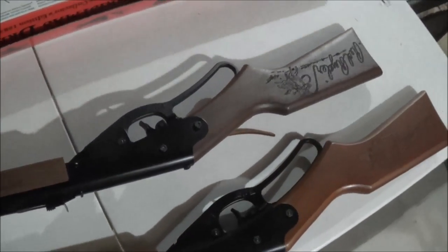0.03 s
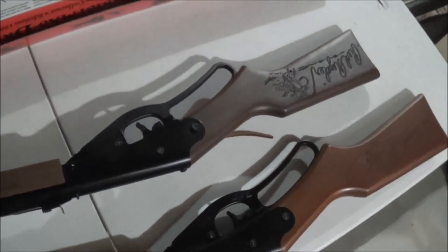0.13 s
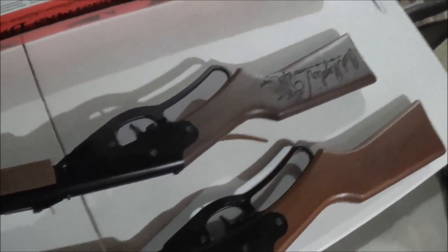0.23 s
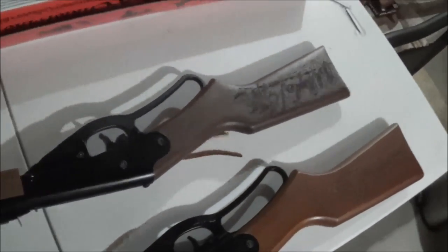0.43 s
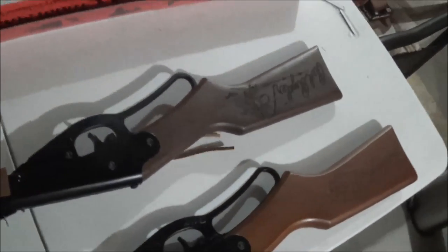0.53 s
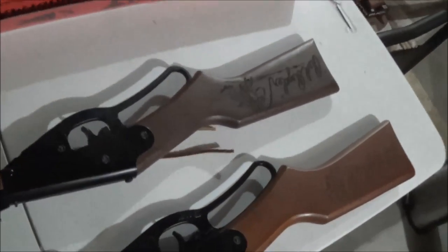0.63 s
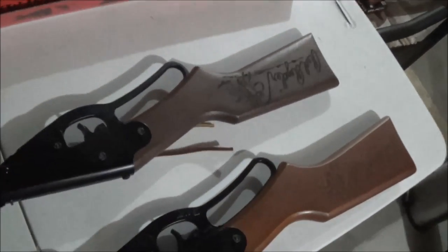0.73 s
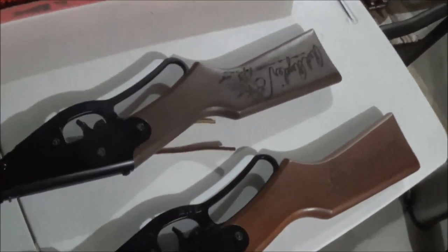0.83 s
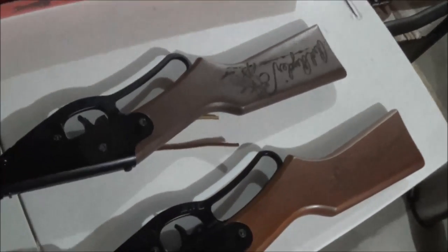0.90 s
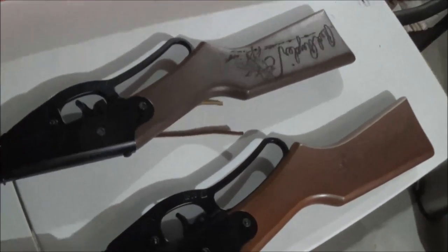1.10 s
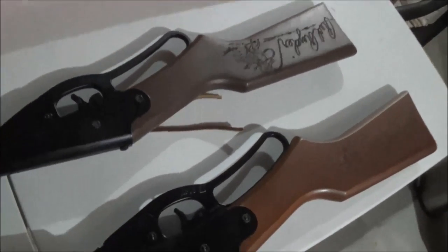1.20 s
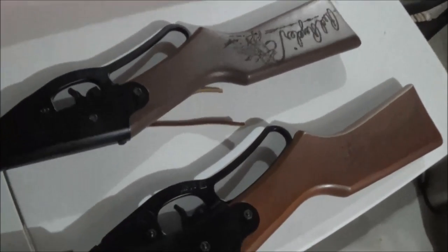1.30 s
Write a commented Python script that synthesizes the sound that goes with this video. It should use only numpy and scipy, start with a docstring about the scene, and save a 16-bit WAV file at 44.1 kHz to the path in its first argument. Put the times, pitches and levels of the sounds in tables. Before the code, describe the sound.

A close microphone in a small room catches a single woody knock with a bright click, then a scrape and quick clattering blows of wooden stocks and metal parts on a table, fading to soft bumps and hiss.

```python
"""Long guns of wood and metal are set down and shifted on a hard tabletop, close to the microphone.
Each contact excites table, stock and metal action as damped modes, decaying noise bursts and short pulses.
Single spots of the tabletop and loose metal pieces ring on as decaying sines.
Sliding wood and rattling metal are coloured noise broken up by many small catches.
A small room answers with a few reflections and a short tail, over faint hiss and a thin electronic whine."""
import sys
import numpy as np
from scipy import signal
from scipy.fft import rfft, irfft, next_fast_len
from scipy.io import wavfile
from scipy.ndimage import map_coordinates

SR = 44100
rng = np.random.default_rng(int(sys.argv[2]) if len(sys.argv) > 2 else 0)


def log_audio(samples):
    """Write samples as a 16-bit WAV file to the path given in sys.argv[1]."""
    # one column per channel
    frames = np.atleast_2d(samples).T
    # limit to full scale, then quantise
    limited = np.clip(frames, -1, 1)
    pcm = np.round(limited * 32767).astype(np.int16)
    wavfile.write(sys.argv[1], SR, pcm)


N = 59535

# Background hiss: freq_hz, relative_db
HISS_SPECTRUM = [(25, -21), (70, -1), (150, -11), (400, -14.5), (1000, -12), (3000, -14.5), (8000, -17),
                 (15000, -19.5), (16500, -40)]
# Hiss loudness: time_s, level_db
HISS_LEVEL = [(0, -52.5), (.45, -53.5), (.65, -57), (1.0, -57), (1.35, -58)]
# Hiss width: freq_hz, side_over_mid_db
HISS_SIDE = [(60, -19), (600, 4.5), (5000, -3.5), (11000, -17.5)]
WHINE_RMS_DB, WHINE_HZ = -61.5, 15734

# Room decay: freq_hz, t60_s
ROOM_T60 = [(80, 0.59), (400, 0.28), (1500, 0.27), (4000, 0.11), (10000, 0.07), (16000, 0.078)]
ROOM_TAIL_DB, ROOM_WALLS_DB, ROOM_SIDE_DB = -13.5, -26.5, -11.5
ROOM_DELAY_S, ROOM_BASS_CUT_HZ = .007, 128

# Sliding and handling loudness: time_s, level_db
SLIDE_LEVEL = [(0, -47.5), (.17, -54.5), (.3, -43), (.42, -39), (.47, -37.5), (.505, -28.5), (.56, -31),
               (.68, -55), (.82, -54.5), (.97, -49.5), (1.1, -58.5), (1.21, -58.5), (1.235, -53),
               (1.35, -59)]
# Sliding colour: freq_hz, relative_db
SLIDE_SPECTRUM = [(30, -10.5), (100, 7.5), (170, 3.5), (400, 0.5), (700, -7), (1500, -16.5), (3500, -22),
                  (7000, -31.5), (15000, -54)]
# Metal rattle loudness: time_s, level_db
RATTLE_LEVEL = [(.46, -49.5), (.5, -31.5), (.53, -40), (.555, -43), (.6, -33), (.66, -66), (.72, -97)]
# Metal rattle colour: freq_hz, relative_db
RATTLE_SPECTRUM = [(600, 10), (1500, -1.5), (2400, -1.5), (3400, -9), (5500, -12), (8000, -13.5),
                   (15000, -26)]

# Table's first heave under a blow: pitch_hz, level_db, t60_s
HEAVE_MODES = [(169, 10, .018)]
# Table frame modes: pitch_hz, level_db, t60_s
FRAME_MODES = [(62.2, -7.5, 0.56), (145.8, -9, 0.34)]
# Tabletop modes: pitch_hz, level_db, t60_s
TOP_MODES = [(269, -20.5, 0.13), (480, -8, 0.13), (510, -10, 0.09), (660.4, -7.5, 0.095), (766, -23, 0.2),
             (934, -4.5, 0.071)]
# Wooden stock modes: pitch_hz, level_db, t60_s
STOCK_MODES = [(1330, -1.5, 0.027), (2330, -3, 0.025), (3140, -8.5, 0.039)]

# Dense resonances of the table under the thud: freq_hz, relative_db
THUD_SPECTRUM = [(25, -35), (45, -16), (62, 18), (110, 17), (190, -6), (300, -8), (600, -30), (2000, -84)]
# Dense resonances of the tabletop: freq_hz, relative_db
TOP_SPECTRUM = [(60, -23), (160, -0.5), (300, 3.5), (450, 0), (700, -3), (1000, -7), (1600, -35),
                (3500, -19), (9000, -115)]
# Dense resonances of the stock: freq_hz, relative_db
STOCK_SPECTRUM = [(80, -14), (380, 3.5), (850, -0.5), (1350, -3.5), (1600, -4), (2400, 1), (3300, -26),
                  (3900, -23), (9000, -89)]
# Dense resonances of the metal action: freq_hz, relative_db
METAL_SPECTRUM = [(200, -33), (1200, -5), (2500, 7), (4000, 1.5), (5300, 6), (7300, -7), (9000, -5.5),
                  (12000, -47), (15500, -51)]
# Bright click: freq_hz, relative_db
CLICK_SPECTRUM = [(500, -74), (4000, -7.5), (6500, -7), (9000, -6.5), (10100, -3), (11200, -6),
                  (12500, -13.5), (15500, -27)]

# Contacts: start_s, thud_db, top_db, stock_db, metal_db, click_db
CONTACTS = [(0.2018, -64, -24, -18, -41, -75), (0.2258, -18, -20.5, -15.5, -25.5, -9.5),
            (0.442, -64, -52, -39.5, -70, -81), (.467, -23.5, -35.5, -44, -70, -56),
            (0.4884, -28, -30, -28, -34, -38), (0.518, -39, -40, -21, -10.5, -20.5),
            (0.5436, -21.5, -18, -18, -10.5, -35), (0.5458, -21.5, -15, -16, -40, -12),
            (0.5744, -24.5, -12.5, -24.5, -18.5, -23.5), (.588, -19.5, -18.5, -58, -50, -35),
            (0.6047, -29, -49, -53, -35, -44), (0.628, -23.5, -39, -37, -38, -16.5),
            (0.8783, -54, -40.5, -36.5, -71, -82), (.889, -65, -38.5, -69, -70, -72)]
# Spot of tabletop or loose metal piece that rings most: start_s, pitch_hz, level_db, t60_s
LOOSE_RINGS = [(0.225, 309.5, -24.5, 0.34), (.228, 417.3, -22.5, 0.22), (0.2261, 10020, -11, 0.013),
               (.442, 1145, -27.5, 0.028), (0.5183, 2938, -15, 0.075), (0.5181, 5150, -13, 0.014),
               (0.5444, 4115, -7, 0.013), (0.5472, 2430, -12.5, 0.024), (.547, 424.6, -8, 0.15),
               (0.574, 2437, -8.5, 0.021), (.575, 293.2, -16, 0.23), (.59, 409.9, -21.5, 0.31),
               (0.6052, 2290, -17.5, 0.017), (.6285, 2375, -22, 0.024), (0.6292, 5000, -28, 0.026),
               (0.887, 417.2, -31, 0.15)]

# Lead of the left port: freq_hz, lead_rad
PORT_LEAD = [(0, 0), (150, 0.025), (520, 0.36), (1500, 1), (2000, 0.24), (3000, 0.58), (4200, 0.62),
             (6800, 0.53), (10000, 0.31), (16000, 0.4)]
# Extra left lead of the tabletop's low sound: time_s, lead_rad
TABLE_LEAD = [(.5, 0), (.55, 0.51), (.7, 0.52), (.85, 0)]
TABLE_LEAD_HZ = 890

THUD_BURST_DB, FRAME_DB, TOP_BURST_DB, TOP_MODES_DB, STOCK_BURST_DB = -6, -3, 1, 2, -2.5
STOCK_SNAP_DB, METAL_SNAP_DB = 14.5, 9.5
THUD_T60_S, TOP_T60_S, STOCK_T60_S, METAL_T60_S, CLICK_T60_S = 0.06, 0.17, 0.058, 0.023, 0.017
TABLE_ATTACK_S, CONTACT_ATTACK_S = 0.0054, .0001
BODY_LEFT_OVER_RIGHT_DB = -0.5
BAND_LIMIT_HZ = 16300


def amp(db):
    """Decibels to gain."""
    return 10 ** (np.asarray(db) / 20)


def unit(x):
    """Scale to rms 1."""
    return x / np.sqrt(np.mean(x ** 2) + 1e-20)


def along(points, hz):
    """Interpolate (freq_hz, value) points on a log frequency axis."""
    freq_hz, value = np.transpose(points)
    return np.interp(np.log(hz + 1), np.log(freq_hz + 1), value)


def over_time(points):
    """Interpolate (time_s, value) points at every sample."""
    return np.interp(np.arange(N) / SR, *np.transpose(points))


def filtered(x, response):
    """Multiply the spectrum of x by a response of frequency."""
    size = next_fast_len(N + SR // 2)
    spectrum = rfft(x, size) * response(np.fft.rfftfreq(size, 1 / SR))
    return irfft(spectrum, size)[..., :N]


def noise(spectrum):
    """Coloured noise of rms 1."""
    white = rng.standard_normal(N)
    return unit(filtered(white, lambda hz: amp(along(spectrum, hz))))


def fade(t60_s, attack_s):
    """A quick rise and an exponential decay."""
    t = np.arange(N) / SR
    return amp(-60 * t / t60_s) * (1 - np.exp(-t / attack_s))


def burst(spectrum, t60_s, attack_s):
    """Many close resonances struck at once, with the energy of their envelope."""
    shape = fade(t60_s, attack_s)
    return unit(noise(spectrum) * shape) * np.sqrt(np.mean(shape ** 2))


def ring(modes, attack_s, scatter_db=1, drift=0.076):
    """Damped modes; the shifting load makes their phase wander (drift: radians per root cycle)."""
    t = np.arange(N) / SR
    total = np.zeros(N)
    for pitch_hz, level_db, t60_s in modes:
        wander = drift * np.sqrt(pitch_hz / SR) * np.cumsum(rng.standard_normal(N))
        gain = amp(level_db + scatter_db * rng.standard_normal())
        total += gain * np.sin(2 * np.pi * pitch_hz * t + wander) * fade(t60_s, attack_s)
    return total


def pulse(spectrum, size=8192):
    """One causal minimum-phase pulse of unit energy with the given colour."""
    log_gain = np.log(amp(along(spectrum, np.fft.rfftfreq(size, 1 / SR))))
    cepstrum = irfft(log_gain)[:size // 2]
    cepstrum[1:] *= 2  # fold to positive time
    wave = irfft(np.exp(rfft(cepstrum, size)))
    return np.pad(wave / np.linalg.norm(wave), (0, N - size))


def add(track, start_s, sound):
    """Mix a sound in from start_s."""
    i = int(np.clip(round(start_s * SR), 0, N - 1))
    track[i:] += sound[:N - i]


def background():
    """Hiss, narrow in the bass and treble, with a thin steady electronic whine."""
    t = np.arange(N) / SR
    whine = np.sqrt(2) * amp(WHINE_RMS_DB) * np.sin(2 * np.pi * WHINE_HZ * t)
    side = filtered(noise(HISS_SPECTRUM), lambda hz: amp(along(HISS_SIDE, hz)))
    hiss = noise(HISS_SPECTRUM) + np.array([[1], [-1]]) * side
    return whine + amp(over_time(HISS_LEVEL)) * hiss


def room(x, wall_count=8):
    """A few near walls, then a short tail that is duller as it dies."""
    hz, t, cells = signal.stft(rng.standard_normal(SR // 2), SR, nperseg=256)
    decay = amp(-60 * t / along(ROOM_T60, hz)[:, None])
    tail = signal.istft(cells * decay, SR, nperseg=256)[1]
    answer = amp(ROOM_TAIL_DB) * tail / np.linalg.norm(tail)
    places = rng.integers(0, SR // 40, wall_count)
    signs = rng.choice([-1, 1], wall_count)
    answer[places] += amp(ROOM_WALLS_DB) * signs / np.sqrt(wall_count)
    answer = signal.lfilter(*signal.butter(1, ROOM_BASS_CUT_HZ, 'high', fs=SR), answer)
    delayed = np.pad(x, (int(ROOM_DELAY_S * SR), 0))
    return signal.fftconvolve(delayed, answer)[:N]


def scrape(level_points, spectrum, rough_db=1.0, catches_per_s=230):
    """Friction noise broken up by many small catches."""
    knots = np.arange(N) * catches_per_s / SR
    catches = map_coordinates(rng.standard_normal(N // 20), [knots])
    return amp(over_time(level_points)) * unit(noise(spectrum) * amp(rough_db * catches))


def heave():
    """The table gives once under a blow and springs back, with no lasting offset."""
    push = ring(HEAVE_MODES, .0004)
    return signal.lfilter(*signal.butter(2, 70, 'high', fs=SR), push)


def table_thud():
    """Heave, dense low resonances and frame modes of the struck table."""
    dense = amp(THUD_BURST_DB) * burst(THUD_SPECTRUM, THUD_T60_S, TABLE_ATTACK_S)
    return heave() + dense + amp(FRAME_DB) * ring(FRAME_MODES, TABLE_ATTACK_S)


def tabletop_ring():
    """Dense resonances and separate modes of the board."""
    dense = amp(TOP_BURST_DB) * burst(TOP_SPECTRUM, TOP_T60_S, TABLE_ATTACK_S)
    return dense + amp(TOP_MODES_DB) * ring(TOP_MODES, TABLE_ATTACK_S)


def stock_knock():
    """A compact first pulse, then the modes and dense resonances of the wood."""
    snap = amp(STOCK_SNAP_DB) * pulse(STOCK_SPECTRUM)
    dense = amp(STOCK_BURST_DB) * burst(STOCK_SPECTRUM, STOCK_T60_S, CONTACT_ATTACK_S)
    return snap + ring(STOCK_MODES, CONTACT_ATTACK_S) + dense


def metal_crack():
    """A compact first pulse, then the dense resonances of the action."""
    snap = amp(METAL_SNAP_DB) * pulse(METAL_SPECTRUM)
    return snap + burst(METAL_SPECTRUM, METAL_T60_S, CONTACT_ATTACK_S)


def bright_click():
    """A very short burst of dense treble resonances."""
    return burst(CLICK_SPECTRUM, CLICK_T60_S, CONTACT_ATTACK_S)


def guns():
    """Contacts excite table, stock and action; returns the centred sound and the gun body's."""
    centre, body = np.zeros(N), np.zeros(N)
    for start_s, thud_db, top_db, stock_db, metal_db, click_db in CONTACTS:
        add(centre, start_s, amp(thud_db) * table_thud())
        add(centre, start_s, amp(top_db) * tabletop_ring())
        add(body, start_s, amp(stock_db) * stock_knock())
        add(centre, start_s, amp(metal_db) * metal_crack())
        add(centre, start_s, amp(click_db) * bright_click())
    for start_s, pitch_hz, level_db, t60_s in LOOSE_RINGS:
        add(body, start_s, ring([(pitch_hz, level_db, t60_s)], 1 / pitch_hz, drift=0.24))
    return centre, body


def table_lead(ports, sides):
    """The flexing tabletop reaches the two ports out of step: a phase turn of the low sound."""
    low = filtered(ports, lambda hz: 1 / (1 + (hz / TABLE_LEAD_HZ) ** 4))
    turn_rad = sides * over_time(TABLE_LEAD) / 2
    turned = np.real(signal.hilbert(low) * np.exp(1j * turn_rad))
    return ports - low + turned


def scene():
    """Blows, sliding, rattle and room reach the left port a little earlier; background is added."""
    centre, body = guns()
    centre = centre + scrape(SLIDE_LEVEL, SLIDE_SPECTRUM)
    body = body + scrape(RATTLE_LEVEL, RATTLE_SPECTRUM)
    dry = centre + body
    sides = np.array([[1], [-1]])  # left, right
    near = centre + body * amp(sides * BODY_LEFT_OVER_RIGHT_DB / 2) + room(dry)
    ports = filtered(near, lambda hz: np.exp(.5j * sides * along(PORT_LEAD, hz)))
    room_side = sides * amp(ROOM_SIDE_DB) * room(dry)
    return table_lead(ports, sides) + room_side + background()


def record(dry):
    """Round peaks near full scale, then low-pass steeply at the band limit."""
    rounded = dry / (1 + np.abs(dry / .92) ** 6) ** (1 / 6)
    return filtered(rounded, lambda hz: 1 / (1 + (hz / BAND_LIMIT_HZ) ** 120))


dry = scene()
out = record(dry)
log_audio(out)
```